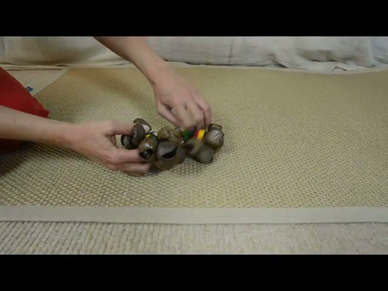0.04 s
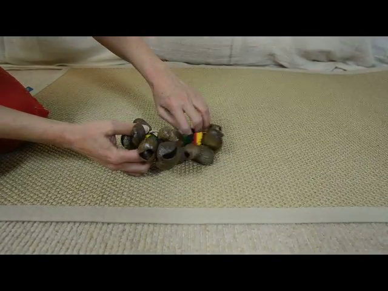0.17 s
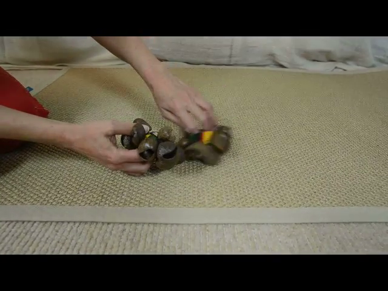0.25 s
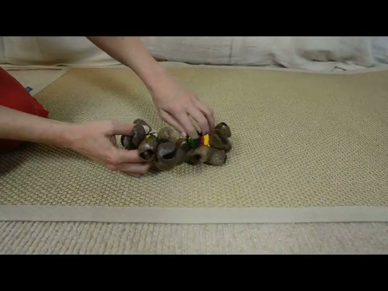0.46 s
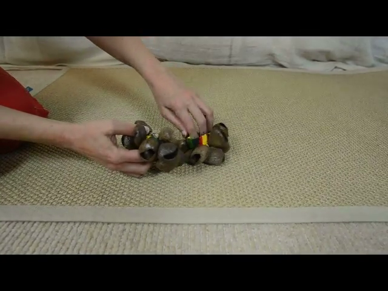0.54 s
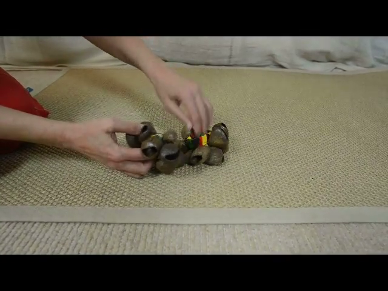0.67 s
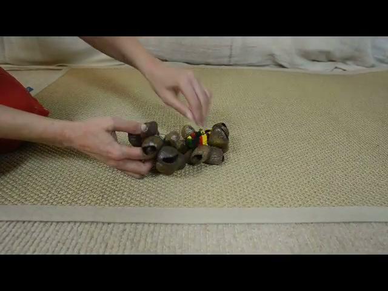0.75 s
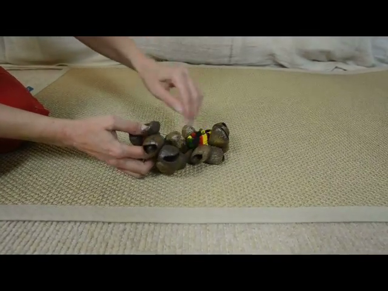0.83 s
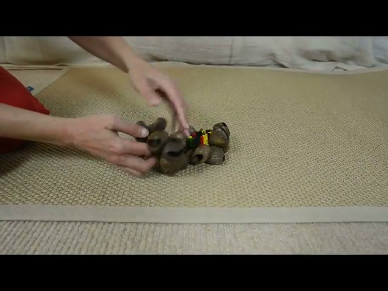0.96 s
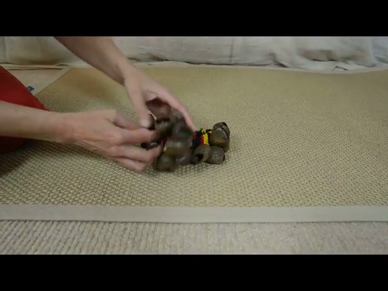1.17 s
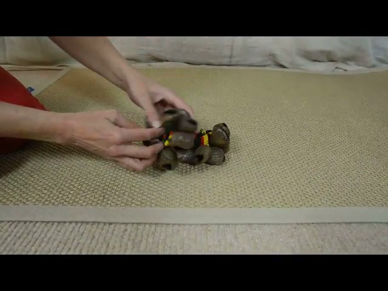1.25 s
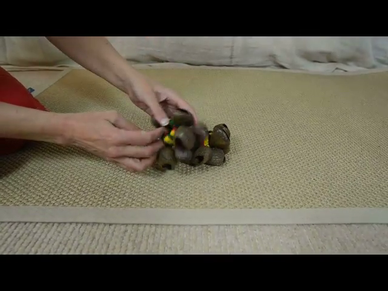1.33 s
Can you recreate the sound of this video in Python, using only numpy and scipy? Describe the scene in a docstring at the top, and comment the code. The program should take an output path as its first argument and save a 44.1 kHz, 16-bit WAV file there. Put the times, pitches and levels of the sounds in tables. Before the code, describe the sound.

A bunch of hard seed shells clacks and rattles as hands turn it over on a woven mat. The dry, slightly hollow clicks come in uneven clusters with light scraping, then thin out, heard close in a quiet small room.

```python
"""Dry, woody clacks: two hands turn over a bunch of hard seed shells on a woven mat in a quiet room.
Each collision gives a bright contact tick, a short ring of the shell wall's modes and a faint hollow
note of the air in the cavity. Between the clacks the shells jostle and scrape, and the bunch drops
softly onto the mat. A small room reverberates, over a low mains hum."""
import sys
import numpy as np
from scipy import signal
from scipy.fft import rfft, irfft
from scipy.io import wavfile
from scipy.ndimage import uniform_filter1d

SR = 44100
rng = np.random.default_rng(int(sys.argv[2]) if len(sys.argv) > 2 else 0)


def generate_wav(signal):
    """Clip the signal to [-1, 1] and save it as 16-bit WAV at the path in sys.argv[1]."""
    frames = np.transpose(np.atleast_2d(signal))
    scaled = np.clip(frames, -1, 1) * 32767
    pcm = np.round(scaled).astype(np.int16)
    wavfile.write(sys.argv[1], SR, pcm)


N = 61739
STRIKE_S = .0025  # the opening span over which a collision's level is set
RING_TIME = np.arange(0, .08, 1 / SR)  # time axis of one collision [s]


def amp(db):
    """Amplitude ratio of a level in decibels."""
    return 10 ** (np.asarray(db) / 20)


def unit_rms(x, span_s=None):
    """Normalisation to rms 1, over the whole sound or its first span_s seconds."""
    return x / np.sqrt(np.mean(x[:round(span_s * SR) if span_s else None] ** 2) + 1e-20)


def decay(t, t60):
    """Exponential damping: the amplitude falls 60 dB in t60 seconds."""
    return np.exp(-np.log(1000) * t / t60)


def value_at(points, hz):
    """Interpolation of a table on a logarithmic frequency axis."""
    f, value = np.transpose(points)
    return np.interp(np.log(hz + 1), np.log(f), value)


def add(mix, start_s, sound):
    """Superposition of a sound on the mix."""
    part = mix[max(round(start_s * SR), 0):][:len(sound)]
    part += sound[:len(part)]


def colour(x, spectrum, size=2048):
    """Minimum-phase filtering: the phase follows from the log gain by the Hilbert transform."""
    log_gain = np.log(amp(value_at(spectrum, abs(np.fft.fftfreq(size, 1 / SR)))))
    taps = np.fft.ifft(np.exp(np.conj(signal.hilbert(log_gain)))).real
    return signal.fftconvolve(x, taps[:size // 2])[:len(x)]


def background(air_db=-65):
    """Noise floor: odd harmonics of the mains over the broadband noise of a still room."""
    # mains hum (frequency [Hz], rms level [dB])
    harmonics = [(50, -68), (150, -85)]
    # still air (frequency [Hz], relative spectral density [dB])
    air_spectrum = [(20, 18), (70, -17), (130, -9.5), (250, -15), (600, -13), (1500, -4), (4000, -44),
                    (10000, -31.5), (16000, -48)]
    t = np.arange(N) / SR
    hum = sum(np.sqrt(2) * amp(db) * np.sin(2 * np.pi * (hz * t + rng.random())) for hz, db in harmonics)
    air_gain = amp(value_at(air_spectrum, np.fft.rfftfreq(N, 1 / SR)))
    air = irfft(rfft(rng.standard_normal(N)) * air_gain, N)
    return hum + amp(air_db) * unit_rms(air)


def reverberation(x, level_db=-16.5, delay_s=.008):
    """Diffuse field of a small room: convolution with a noise tail whose treble dies first."""
    # room decay (frequency [Hz], t60 [s])
    decay_times = [(300, 0.28), (1500, 0.25), (3000, 0.21), (7000, 0.15), (14000, 0.095)]
    hz, t, noise = signal.stft(rng.standard_normal(SR // 2), SR, nperseg=256)
    tail = signal.istft(noise * decay(t, value_at(decay_times, hz)[:, None]), SR)[1]
    tail *= np.arange(len(tail)) > delay_s * SR
    return amp(level_db) * signal.fftconvolve(x, tail / np.linalg.norm(tail))[:N]


def with_reflections(x):
    """Interference of the direct sound with its early reflections."""
    # reflections from the mat and the hands (delay [s], gain [ratio])
    echoes = [(.0021, 0.039), (.0047, -0.047)]
    out = x.copy()
    for delay_s, gain in echoes:
        add(out, delay_s, gain * x)
    return out


def thumps(rise_s=.019):
    """Soft impact: the bunch meets the mat slowly, so the energy lies at low frequencies."""
    # landings (time [s], level [dB])
    landings = [(.17, -65), (0.411, -90), (0.662, -70), (0.704, -62), (0.954, -71)]
    # colour of a thump (frequency [Hz], relative spectral density [dB])
    spectrum = [(15, -15), (30, 0), (55, 2.5), (90, -17.5), (200, -24), (400, -24.5), (1000, -46),
                (4000, -80)]
    out = np.zeros(N)
    age = np.arange(SR // 5) / SR / rise_s
    envelope = age * np.exp(1 - age)
    for start_s, level_db in landings:
        rumble = unit_rms(colour(rng.standard_normal(len(age)), spectrum))
        add(out, start_s, amp(level_db) * envelope * rumble)
    return out


def modal_ring(modes, weight=1, detune=.015, uneven_db=2):
    """Free vibration: a sum of damped sines, each slightly random in frequency and strength."""
    hz, db, t60 = np.transpose(modes)
    pitch_draw, level_draw = rng.standard_normal((2, len(hz)))
    t = RING_TIME[:, None]
    waves = decay(t, t60) * np.sin(2 * np.pi * hz * (1 + detune * pitch_draw) * t)
    return waves @ (weight * amp(db + uneven_db * level_draw))


def cavity_note(vary_db=3, low_cut_hz=445):
    """Cavity resonance: the enclosed air sounds a low note, with a new mix of modes each time."""
    # air modes of the hollow shells (frequency [Hz], relative level [dB], t60 [s])
    modes = [(532, -11, 0.029), (700, -16.5, 0.023), (872, 0.5, 0.066), (1220, -6, 0.016),
             (1288.7, 0.5, 0.075), (1417, 3, 0.0088), (1613.6, 1, 0.095)]
    weight = rng.choice([-1, 1], len(modes)) * amp(vary_db * rng.standard_normal(len(modes)))
    note = modal_ring(modes, weight, detune=.018)
    low_cut = signal.butter(2, low_cut_hz, "high", fs=SR, output="sos")
    return unit_rms(signal.sosfilt(low_cut, note), 2 * STRIKE_S)


def wall_ring(centre_hz, spread_hz, blow_db, off_centre_db=-24.5, soft_blow_db=-36):
    """Impulse response: a struck shell cracks for a few cycles, then rings in modes near its pitch."""
    # modes of the shell walls (frequency [Hz], relative level [dB], t60 [s])
    modes = [(2000, -35, .02), (2030, 16, 0.052), (2220, -26, 0.017), (2386, 10.5, 0.032),
             (2320, 19, 0.031), (2550, -13, 0.014), (2606, 12, 0.031), (2755, 14.5, 0.034),
             (2922, 14.5, 0.035), (3015, 14, 0.023), (3200, 17, 0.0082), (3401, 12.5, 0.05),
             (3700, 14, 0.027), (4150, -20, 0.02)]
    # radiation efficiency of small shells (frequency [Hz], gain [dB])
    radiation = [(100, -41), (400, -19), (900, -12.5), (1800, -1.5), (3900, 2.5), (5000, -6),
                 (12000, -22.5)]
    hz, t = np.transpose(modes)[0], RING_TIME
    age = 2 * np.pi * .63 * spread_hz * t  # the wider the band, the shorter the crack
    crack = unit_rms(age * np.exp(-age) * np.sin(2 * np.pi * centre_hz * t), STRIKE_S)
    weight = np.exp(-.5 * ((hz - centre_hz) / spread_hz) ** 2) + amp(off_centre_db)
    ring_db = 6 + .38 * (blow_db + 32)  # harder blows ring more, relative to the crack
    ring = amp(ring_db) * unit_rms(modal_ring(modes, weight), STRIKE_S)
    rise_s = .00052 / (1 + amp(blow_db - soft_blow_db) ** 2)  # light blows close more gradually
    rise = 1 - np.exp(-t / rise_s)
    return unit_rms(colour((crack + ring) * rise, radiation), STRIKE_S)


def contact_tick(rise_s=.00054, vary_db=3, grit_db=2.5, overtone_db=-8):
    """Hard contact: a brief force excites a broad burst of noise and the walls' high overtones."""
    # colour of the tick (frequency [Hz], relative spectral density [dB])
    spectrum = [(150, -21.5), (600, -9), (1500, 0), (4000, 0), (5300, -4), (6200, -1.5), (7000, -3),
                (8500, -5.5), (9200, 1), (9800, 1), (10500, -0.5), (11500, 2.5), (12500, -1.5),
                (13500, -5.5), (15500, -7.5)]
    # high modes of the shell walls (frequency [Hz], relative level [dB], t60 [s])
    overtones = [(6847, -3, 0.015), (7800, -9.5, 0.018), (9650, 3, 0.0082), (11500, -13, 0.0078),
                 (12640, -7.5, 0.0066)]
    t = RING_TIME
    hz, db = np.transpose(spectrum)
    varied_spectrum = np.transpose([hz, db + vary_db * rng.standard_normal(len(hz))])
    rise = 1 - np.exp(-t / rise_s)
    fade = decay(t, t60=.0061) + amp(-22) * decay(t, t60=.028)
    grit = amp(grit_db * unit_rms(uniform_filter1d(rng.standard_normal(len(t)), size=30)))
    burst = rise * fade * grit * rng.standard_normal(len(t))
    splash = unit_rms(colour(burst, varied_spectrum), STRIKE_S)
    glint = unit_rms(rise * modal_ring(overtones), STRIKE_S)
    return unit_rms(splash + amp(overtone_db) * glint, STRIKE_S)


def contacts(per_s, spread_db):
    """Poisson process: independent small impulses of uneven strength and random sign."""
    strength = amp(spread_db * np.minimum(rng.exponential(1, N), 3))
    return strength * rng.choice([-1, 1], N) * (rng.random(N) < per_s / SR)


def jostle(shell_count=20, knocks_per_s=600, middle_hz=2562, scatter_hz=732):
    """Light impacts and friction: random impulses excite the shells as the hands move the bunch."""
    # vigour of the jostling (time [s], relative knock level [dB], relative scrape level [dB])
    vigour = [(0, -50.5, -63.5), (.05, -54.5, -73), (.125, -58, -65), (0.149, -45, -56.5),
              (0.201, -57, -52.5), (0.246, -64, -74), (.29, -52, -68), (.325, -56, -71), (.385, -45, -63),
              (0.417, -42.5, -50), (0.471, -46.5, -71), (.52, -60.5, -67), (.555, -54, -64.5),
              (.59, -61, -69), (0.648, -59, -78), (0.676, -36.5, -46.5), (0.697, -69, -67), (.74, -61, -87),
              (.81, -57, -68), (0.846, -46.5, -55.5), (.89, -52, -71), (.92, -53, -70), (0.946, -38.5, -54),
              (1.0, -65, -56), (1.065, -59.5, -70.5), (1.113, -41, -70), (1.16, -68, -77), (1.23, -89, -78),
              (1.35, -93, -77), (1.4, -52, -76)]
    # colour of dry scraping (frequency [Hz], relative spectral density [dB])
    scrape_spectrum = [(150, -2.5), (350, -2), (550, 7.5), (1200, 12.5), (4000, 9), (5300, 5), (7000, 2.5),
                       (8500, -6), (9800, -4.5), (12500, 1), (14000, -10), (16000, -12)]
    times, knock_db, scrape_db = np.transpose(vigour)
    t, knocks = np.arange(N) / SR, np.zeros(N)
    for place in np.linspace(-1, 1, shell_count):
        centre_hz = middle_hz + scatter_hz * place * abs(place)  # pitches crowd near the middle
        shell = wall_ring(centre_hz, spread_hz=290, blow_db=knock_db.mean()) + amp(-19.5) * cavity_note()
        knocks += signal.oaconvolve(contacts(knocks_per_s / shell_count, spread_db=3), shell)[:N]
    scrape = colour(contacts(per_s=1600, spread_db=5.5), scrape_spectrum)
    knock_gain = amp(np.interp(t, times, knock_db) - 4.5)
    scrape_gain = amp(np.interp(t, times, scrape_db) - 1.5)
    return knock_gain * unit_rms(knocks) + scrape_gain * unit_rms(scrape)


def clacks(wall_gain_db=-6.5, tick_gain_db=-6, cavity_gain_db=-13):
    """Impact excitation: each distinct collision sounds wall, contact and cavity at once."""
    # collisions, with levels before the gains (time [s], wall level [dB], tick level [dB],
    # cavity level [dB], ring centre [Hz], ring spread [Hz])
    collisions = [ (0.024, -42, -70, -51, 2240, 254), (0.034, -51, -73, -74, 3000, 110),
                  (0.0606, -48, -50.5, -44, 2960, 610), (0.0681, -31, -44.5, -51, 3314, 170),
                  (0.0766, -25.5, -49, -45.5, 3305, 109), (0.1006, -32, -53.5, -67, 2700, 610),
                  (0.0992, -44, -65, -53, 1460, 70.6), (0.135, -37.5, -57, -57, 2650, 259),
                  (0.1406, -38, -72, -38.5, 2570, 262), (0.1524, -29.5, -41.5, -37.5, 2500, 450),
                  (.1730, -28.5, -42, -48, 2850, 450), (0.1773, -32.5, -67, -50, 2560, 350),
                  (0.1839, -25, -40.5, -50, 2520, 480), (0.1861, -25, -40, -38.5, 2240, 364),
                  (0.1923, -28.5, -53, -54, 2250, 345), (.1960, -39, -61, -65, 2520, 170),
                  (0.207, -37, -52, -36.5, 3140, 660), (0.2698, -36.5, -55, -45.5, 2340, 170),
                  (0.2967, -35, -52, -49, 2560, 290), (0.3094, -36.5, -51, -81, 2280, 217),
                  (.3163, -36, -46, -39.5, 2540, 325), (.3232, -31, -51, -54, 2510, 393),
                  (0.3271, -39.5, -55, -52, 3430, 120), (0.347, -39.5, -84, -68, 3470, 177),
                  (0.3586, -32, -51.5, -41, 3070, 520), (0.3612, -37, -43.5, -40, 2460, 200),
                  (0.368, -35, -67, -42.5, 2364, 112), (0.4134, -36, -43.5, -37.5, 2350, 417),
                  (.4169, -48, -49, -36, 2400, 160), (0.441, -22.5, -56, -43.5, 2560, 173),
                  (0.443, -23, -74, -86, 2400, 172), (0.4531, -28.5, -29, -59, 2060, 149),
                  (0.4713, -57, -69, -69, 2440, 239), (0.4785, -39, -90, -57, 2310, 320),
                  (0.5013, -37.5, -80, -69, 2090, 108), (0.54, -43, -66, -68, 2320, 81),
                  (0.5637, -35, -36, -41, 2670, 710), (.5745, -38, -35.5, -43, 2660, 670),
                  (0.5778, -28, -44, -40.5, 2970, 800), (0.5857, -35, -46, -67, 2560, 400),
                  (0.594, -36.5, -43.5, -78, 2360, 240), (0.599, -41, -50, -69, 2450, 300),
                  (0.608, -36, -58, -75, 3380, 119), (.6226, -45.5, -85, -79, 3340, 250),
                  (0.635, -43, -60, -67, 2370, 109), (0.6691, -29, -55, -76, 2600, 310),
                  (0.6744, -33, -47.5, -43, 2710, 310), (0.6987, -42, -44, -45, 2170, 250),
                  (0.706, -36, -59, -46.5, 2780, 485), (0.7102, -18, -31.5, -36.5, 2670, 522),
                  (0.7123, -35, -62, -66, 2480, 262), (0.7242, -31.5, -55, -65, 2830, 450),
                  (0.7506, -27.5, -42, -49, 2970, 480), (0.76, -34.5, -81, -75, 2610, 400),
                  (0.77, -60, -77, -61, 2630, 330), (0.8204, -35.5, -43.5, -41, 2660, 416),
                  (0.8327, -34.5, -44, -35.5, 2500, 360), (0.841, -43, -53, -46, 2290, 228),
                  (0.8575, -33, -48, -72, 2570, 380), (0.9018, -37, -66, -73, 2630, 259),
                  (.9278, -38, -56, -36.5, 2540, 190), (0.9366, -31.5, -44, -43.5, 2460, 330),
                  (0.9386, -31.5, -58, -54, 2370, 280), (0.958, -36, -46.5, -34.5, 2645, 263),
                  (0.9665, -35, -62, -34, 2840, 400), (0.9722, -16, -34, -75, 2840, 524),
                  (0.9734, -33, -46, -43, 3000, 149), (.9750, -33, -56, -53, 1920, 150),
                  (.9815, -27, -39, -70, 2930, 620), (.9863, -60, -57, -41.5, 2540, 650),
                  (0.9936, -51, -43, -67, 2950, 650), (1.0013, -28.5, -41.5, -66, 2960, 573),
                  (1.0084, -56, -73, -61, 2670, 360), (1.0262, -35, -78, -49.5, 2780, 220),
                  (1.0318, -34.5, -55.5, -44, 2500, 555), (1.0554, -42, -75, -64, 2400, 79),
                  (1.0826, -36.5, -42, -40.5, 2500, 553), (1.1012, -35.5, -34, -33, 2830, 300),
                  (1.1147, -66, -60, -46.5, 2530, 310), (1.1197, -41, -50, -44, 2560, 380),
                  (1.1273, -45, -73, -68, 2410, 240), (1.1721, -46.5, -66, -45, 2060, 790),
                  (1.1770, -57.5, -65, -50, 3960, 150), (1.2046, -51, -79, -54, 2240, 584),
                  (1.2512, -35.5, -49.5, -51, 1883, 170), (1.2516, -37.5, -62, -61, 2860, 470),
                  (1.26, -40.5, -53, -42.5, 2100, 326), (1.3763, -52, -68, -55, 2270, 90),
                  (1.3925, -42.5, -56, -56, 2240, 163)]
    out = np.zeros(N)
    for start_s, wall_db, tick_db, cavity_db, centre_hz, spread_hz in collisions:
        wall = amp(wall_db + wall_gain_db) * wall_ring(centre_hz, spread_hz, wall_db)
        tick = amp(tick_db + tick_gain_db) * contact_tick()
        cavity = amp(cavity_db + cavity_gain_db) * cavity_note()
        add(out, start_s, wall + tick + cavity)
    return out


def scene():
    """Superposition of the shells, their reflections, the thumps and the noise floor in one channel."""
    shells = clacks() + jostle()
    return (with_reflections(shells) + reverberation(shells) + thumps() + background())[None]


def record(dry, cutoff_hz=15900):
    """Band limiting: a linear-phase low-pass filter removes the highest treble."""
    low_pass = signal.firwin(255, cutoff_hz, window=("kaiser", 8), fs=SR)
    return signal.oaconvolve(dry, low_pass[None], "same")


dry = scene()
out = record(dry)
generate_wav(out)
```